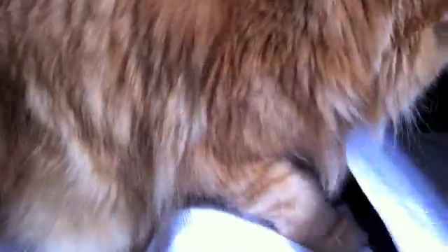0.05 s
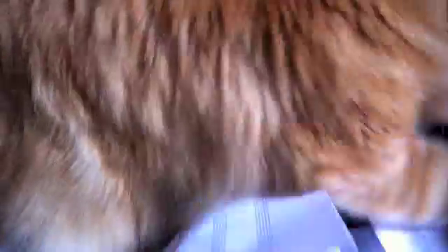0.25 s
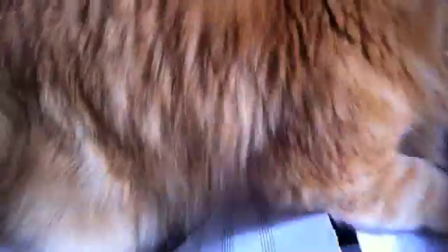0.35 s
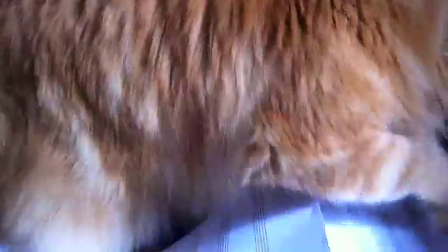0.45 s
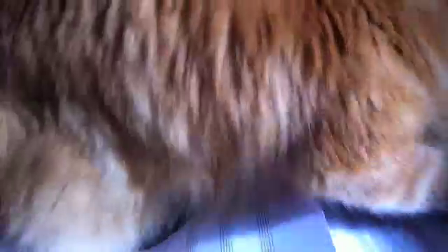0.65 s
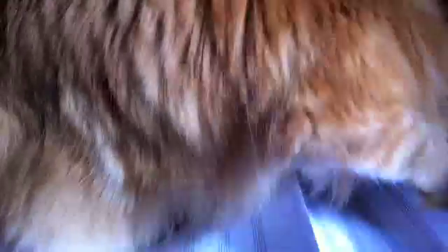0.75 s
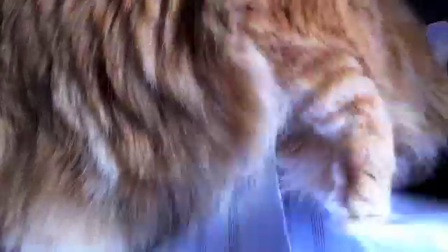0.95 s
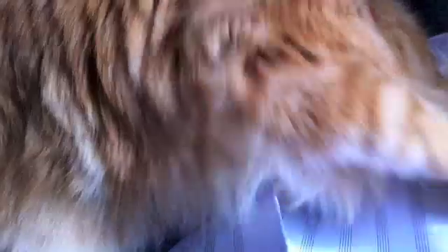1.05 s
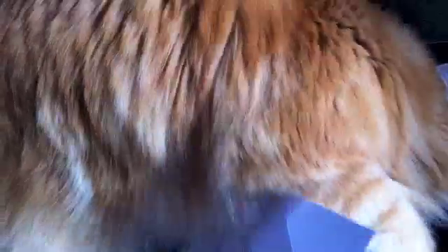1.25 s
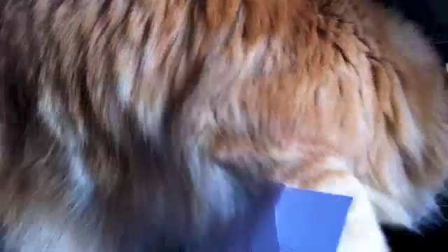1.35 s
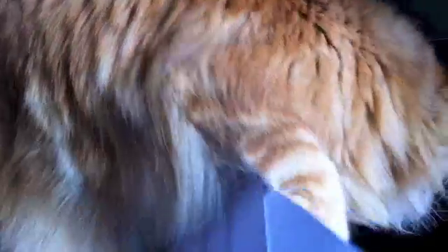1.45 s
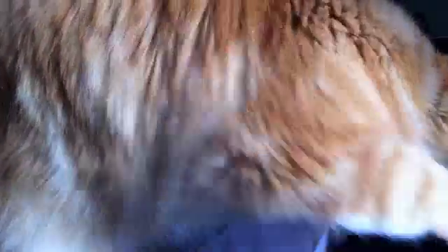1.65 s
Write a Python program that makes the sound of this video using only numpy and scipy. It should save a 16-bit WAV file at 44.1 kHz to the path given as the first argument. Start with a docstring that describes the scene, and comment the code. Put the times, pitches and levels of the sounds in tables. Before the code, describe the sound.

Paper rustles close by under a cat's paws, starting lightly and swelling into sharp crackles around 0.3 to 0.4 seconds. The sheets slide with a hiss, then crinkle again near 0.75 and 0.95 seconds, with soft knocks on hollow plastic beneath. A fuller snap and small thump come at 1.25 seconds. A smoother sliding hiss follows, fading by about 1.7 seconds in a small, quiet room.

```python
"""Paper crackles and snaps close by as a cat treads on loose sheets lying on a printer.
Each push drags paper over paper, and stick-slip friction gives a hiss with a fine crackle.
The sheets buckle with dry snaps and sing faintly where they slide taut. Under them the paws
excite the modes of the hollow plastic casing. A small, quiet room lies behind."""
import sys
import numpy as np
from scipy import signal
from scipy.io import wavfile

SR = 44100
rng = np.random.default_rng(int(sys.argv[2]) if len(sys.argv) > 2 else 0)


def file_out(sig):
    """Save sig as 16-bit WAV at sys.argv[1]."""
    # one column per channel
    cols = np.atleast_2d(sig).T
    # limit, then scale
    lim = np.clip(cols, -1, 1)
    pcm = np.round(lim * 32767).astype(np.int16)
    wavfile.write(sys.argv[1], SR, pcm)


N = 74970
T = np.arange(N) / SR
HZ = np.fft.rfftfreq(8192, 1 / SR)


# Pushes that drag the sheets. Each row: peak time, rise and fall in seconds, crackle share of the
# power from 0 to 1, then levels in dB of the paper's four registers: flap, body, rasp and fizz.
PUSHES = [(.008, 0.037, 0.022, 0.32, -47, -46, -49.5, -50),
          (.075, 0.045, 0.064, 0.8, -52.5, -57, -58.5, -61),
          (.224, 0.026, 0.023, 0.7, -52.5, -48, -47, -45),
          (0.273, 0.026, 0.017, 0.74, -50.5, -41, -41, -47),
          (.288, 0.0065, .011, 0.4, -53.5, -40, -42, -32.5),
          (.303, 0.0078, .012, .25, -47, -40.5, -41, -35),
          (.345, 0.029, 0.022, 0.42, -47, -39.5, -35, -39.5),
          (0.375, .013, 0.018, 0.44, -44.5, -32, -32.5, -37),
          (.462, 0.032, 0.02, 0.18, -59.5, -51.5, -44.5, -45.5),
          (0.528, 0.11, 0.062, .15, -57.5, -49.5, -47.5, -48.5),
          (0.689, 0.039, 0.092, 0.47, -54, -50.5, -47.5, -48),
          (0.776, 0.02, 0.027, 0.64, -46.5, -41, -38, -37.5), (.82, 0.05, 0.082, .1, -54, -53, -52, -52),
          (0.916, .022, 0.01, 0.4, -53, -50.5, -44.5, -43),
          (0.953, 0.046, 0.058, 0.4, -52, -43.5, -41, -45),
          (1.066, 0.023, 0.012, .5, -61, -50, -40.5, -41.5),
          (1.094, 0.028, 0.036, 0.06, -54.5, -49, -45, -43.5),
          (1.189, 0.049, 0.078, 0.25, -53.5, -40.5, -39.5, -38.5),
          (1.279, 0.0053, 0.018, 0.26, -46.5, -35, -39, -47),
          (1.35, 0.059, 0.047, 0.2, -65, -67, -46, -43.5),
          (1.43, 0.083, 0.034, 0, -64.5, -44.5, -44.5, -45.5),
          (1.514, 0.073, 0.068, 0.08, -83, -57.5, -47, -45.5),
          (1.583, 0.08, 0.069, 0.1, -69, -55, -50.5, -50.5),
          (1.695, 0.031, .03, 0.15, -92, -67, -52, -52.5)]
GRAINS_PER_S, GRAIN_SPREAD_DB = 2600, 4.5
JUDDER_DB, JUDDER_HZ = 2.1, 110
PUSH_SHAPE = 1.55  # 1 = pointed, 2 = bell

def rustle(registers):
    """Stick-slip friction: sliding paper hisses, and fibres that catch and slip add a juddering crackle."""
    size = amp(GRAIN_SPREAD_DB * np.minimum(rng.exponential(1, N), 4))
    grains = rng.choice([-1., 1.], N) * size * (rng.random(N) < GRAINS_PER_S / SR)
    judder = low_noise(JUDDER_HZ, N)
    grains = unit(grains * amp(JUDDER_DB * judder))
    hiss = rng.standard_normal(N)
    grain_power, hiss_power = np.zeros((2, len(registers), N))
    for peak, rise, fall, crackle, *levels in PUSHES:
        swell = np.exp(-(abs(T - peak) / np.where(T < peak, rise, fall)) ** PUSH_SHAPE)
        power = (amp(levels)[:, None] * swell) ** 2
        grain_power += crackle * power
        hiss_power += (1 - crackle) * power
    return sum(through(grains * np.sqrt(rough) + hiss * np.sqrt(smooth), response)
               for rough, smooth, response in zip(grain_power, hiss_power, registers))


# Creases giving way. Each row: start and length in seconds, crease resonance in Hz,
# then flap, body, rasp and fizz levels in dB.
SNAPS = [(.0290, .003, 10100, -73, -58, -46.5, -40.5), (0.0581, 0.0049, 5260, -43.5, -39.5, -36, -39),
         (0.1834, 0.0018, 1900, -50.5, -47.5, -49, -51), (0.2075, 0.0014, 6200, -53, -36, -30.5, -39),
         (0.2125, 0.0027, 2140, -67, -39, -37.5, -42), (0.3322, 0.0062, 2040, -54, -28, -23, -27.5),
         (0.3612, 0.0032, 2700, -43.5, -37, -40, -52), (0.3817, 0.00081, 2780, -48, -28, -18.5, -20),
         (0.3849, 0.00063, 11100, -49, -47, -16, -10.5), (0.6513, 0.002, 2050, -66, -36.5, -42.5, -60),
         (0.6551, 0.002, 5800, -62, -44, -32.5, -56), (0.687, .0023, 1760, -47.5, -35, -34.5, -44),
         (0.714, 0.0018, 1990, -59, -43, -54, -48), (0.7612, 0.0028, 2020, -62, -36, -44, -45),
         (0.7659, 0.0063, 1800, -45.5, -36, -38.5, -44), (0.9348, 0.0014, 6500, -56, -30, -18.5, -23.5),
         (0.9379, 0.0049, 1820, -42, -39.5, -30, -35.5), (1.0436, .003, 5170, -74, -43, -34, -41.5),
         (1.0840, 0.0025, 2670, -70, -38, -36.5, -46), (1.149, 0.00096, 2200, -55, -38, -33.5, -34.5),
         (1.1715, .002, 1900, -52, -37, -35.5, -46), (1.1888, 0.0033, 4650, -49, -34, -27, -31),
         (1.2505, 0.002, 1460, -35.5, -22.5, -28, -34), (1.2542, 0.0065, 1560, -41.5, -28, -25.5, -35.5),
         (1.51, 0.0045, 2550, -63, -43, -47.5, -62), (1.6005, 0.0028, 4200, -76, -50.5, -45, -52)]
SNAP_ATTACK_S, SNAP_RELEASE = 0.000063, 0.79  # release as a share of the length
REGISTER_RING_S = (0.003, 0.0019, 0, 0)  # flap and body ring on
FIRST_SLIP_BOOST, FIRST_SLIP_S = 0.5, 0.00048
CREASE_Q, CREASE_GAIN = 8, 1.93

def snaps(registers):
    """Buckling: a crease gives way in an avalanche of clicks, coloured by a resonance of its own."""
    out, t = np.zeros(N), T[:4096]
    attack = np.minimum(t / SNAP_ATTACK_S, 1)
    first_slip = 1 + FIRST_SLIP_BOOST * np.exp(-t / FIRST_SLIP_S)
    for start, length, crease_hz, *levels in SNAPS:
        clicks = rng.choice([-1., 1.], len(t))
        crease = signal.iirpeak(crease_hz, CREASE_Q, fs=SR)
        for db, response, ring_s in zip(levels, registers, REGISTER_RING_S):
            envelope = attack * np.exp(-np.maximum(t - length, 0) / (SNAP_RELEASE * length + ring_s))
            burst = through(clicks * envelope * first_slip, response)
            burst += CREASE_GAIN * signal.lfilter(*crease, burst)
            add(out, start, amp(db) * burst * np.linalg.norm(envelope) / np.linalg.norm(burst))
    return out


# The colour of the paper. Each row: frequency in Hz, relative spectral level in dB.
PAPER_SPECTRUM = [(30, -42), (95, -32), (140, -6.5), (200, -2.5), (300, 1), (400, 1), (520, 0), (700, -1.5),
                  (1150, 5), (1600, 9), (2100, 7.5), (2800, 4), (3300, -1.5), (4000, 2.5), (4900, 7.5),
                  (6200, 4), (7600, -2), (8500, 0), (9800, -1), (12000, -5.5), (14000, -6), (15600, -8.5)]
# Borders in Hz between flap (whole sheet), body (panels), rasp (creases) and fizz (fibres).
CROSSOVERS_HZ = [808, 3320, 6850]

def paper_registers(order=10):
    """Impulse responses: the paper's answer to one click, split into four bands of unit energy."""
    lowpasses = [1 / (1 + (HZ / hz) ** order) for hz in CROSSOVERS_HZ]
    bands = np.diff([np.zeros_like(HZ), *lowpasses, np.ones_like(HZ)], axis=0)
    colour = amp(curve_at(PAPER_SPECTRUM, HZ))
    return [minimum_phase(colour * np.sqrt(abs(band))) for band in bands]


# Sheets sliding taut. Each row: start and length in seconds, first and last pitch in Hz, level in dB.
SLIDES = [(0.444, 0.062, 1408, 1523, -42), (0.483, 0.0763, 1649, 1967, -43), (.5, 0.056, 5330, 5450, -44),
          (1.367, 0.087, 2000, 1945, -43), (1.368, 0.075, 2747, 2690, -48.5),
          (1.551, 0.038, 1653, 970, -50)]
SLIDE_WIDTH = 0.29  # bandwidth of each pole as a share of the first pitch

def slides():
    """Forced resonance: friction noise drives one broad, gliding resonance of the sheet."""
    out = np.zeros(N)
    for start, length, first_hz, last_hz, db in SLIDES:
        progress = np.arange(0, 1, 1 / (length * SR))
        pole = np.exp(-np.pi * SLIDE_WIDTH * first_hz / SR)
        friction = (rng.standard_normal(N) + 1j * rng.standard_normal(N))[:len(progress)]
        baseband = signal.lfilter([1], [1, -2 * pole, pole * pole], friction)
        pitch_hz = first_hz + (last_hz - first_hz) * progress
        carrier = np.exp(2j * np.pi * np.cumsum(pitch_hz) / SR)
        add(out, start, amp(db) * unit((baseband * carrier).real) * np.sin(np.pi * progress))
    return out


# Paws landing on covered plastic. Each row: start in seconds, knock pitch in Hz, knock and thud in dB.
PAW_STEPS = [(.002, 316, -45, -65), (.06, 330, -42.5, -61), (.25, 257, -44, -54), (0.283, 280, -40.5, -50),
             (.336, 397, -38.5, -52), (.364, 471, -37.5, -53), (.68, 200, -42.5, -59),
             (0.729, 217, -43.5, -70), (0.769, 271, -37.5, -59), (.936, 272, -30.5, -74),
             (.975, 352, -42, -74), (1.054, 218, -62, -62), (1.188, 255, -44.5, -54),
             (1.254, 684, -36, -41.5)]
# Modes of the hollow casing. Each row: frequency in Hz, relative level in dB, 60 dB decay in seconds.
CASING_MODES = [(164, -7, 0.18), (297, 6, 0.13), (373.2, 1.5, 0.53), (552, 5, .12)]
PAW_ONSET_S, KNOCK_T60_S, CASING_DB = 0.0022, 0.084, -16
THUD_DECAY_S, THUD_HZ = 0.012, 129

def paws():
    """Impact excitation: each step thuds, knocks and rings the casing; the full weight booms the tray."""
    out, t = np.zeros(N), T[:SR // 2]
    onset = 1 - np.exp(-t / PAW_ONSET_S)
    casing = amp(CASING_DB) * sum(damped_mode(t, *mode) for mode in CASING_MODES)
    for start, knock_hz, knock_db, thud_db in PAW_STEPS:
        knock = damped_mode(t, knock_hz, knock_db, KNOCK_T60_S)
        thud = amp(thud_db) * low_noise(THUD_HZ, len(t)) * np.exp(-t / THUD_DECAY_S)
        add(out, start, onset * (knock + amp(knock_db) * casing + thud))
    tray = damped_mode(t, hz=127, db=-55, t60=0.6)
    add(out, start=1.262, sound=onset * tray)
    return out


# The room's decay. Each row: frequency in Hz, reverberation time in seconds.
ROOM_T60 = [(150, 0.63), (1500, .25), (6000, 0.13), (15000, 0.045)]
TAIL_DB, EARLY_DB = -19, -24
EARLY_DECAY_S, REFLECTIONS_PER_S = 0.0043, 2000

def reverberation(near):
    """Reflection and absorption: quick echoes off nearby surfaces, then a tail whose treble dies first."""
    t = T[:SR // 2]
    diffuse = rng.standard_normal(len(t)) * (t > 0.004)
    hz, times, spectrum = signal.stft(diffuse, SR, nperseg=256)
    decay = amp(-60 * times / curve_at(ROOM_T60, hz)[:, None])
    _, tail = signal.istft(spectrum * decay, SR, nperseg=256)
    early = rng.standard_normal(len(t)) * (rng.random(len(t)) < REFLECTIONS_PER_S / SR)
    early *= (t > 0.001) * np.exp(-t / EARLY_DECAY_S)
    return (amp(TAIL_DB) * through(near, tail / np.linalg.norm(tail))
            + amp(EARLY_DB) * through(near, early / np.linalg.norm(early)))


# The room's background. Each row: frequency in Hz, relative spectral level in dB.
ROOM_TONE_SPECTRUM = [(30, -64), (85, -42), (140, -0.5), (200, 2.5), (350, -3), (700, -3), (1500, 2.5),
                      (3200, -18.5), (5500, -7.5), (10000, -13), (16000, -9.5)]

def room_tone(db=-60.5):
    """Stationary noise: a faint, steady background with a fixed spectrum."""
    colour = minimum_phase(amp(curve_at(ROOM_TONE_SPECTRUM, HZ)))
    return amp(db) * through(rng.standard_normal(N), colour)


def damped_mode(t, hz, db, t60):
    """Free vibration: a sine that falls 60 dB in t60 seconds."""
    return amp(db - 60 * t / t60) * np.sin(2 * np.pi * hz * t)


def low_noise(cutoff_hz, samples):
    """Low-passed noise of rms 1."""
    lowpass = signal.butter(2, cutoff_hz, fs=SR, output="sos")
    return unit(signal.sosfilt(lowpass, rng.standard_normal(samples)))


def minimum_phase(gain):
    """Minimum-phase impulse response: the given spectral shape with a sharp front and unit energy."""
    log_gain = np.log(np.maximum(gain / gain.max(), 1e-4))
    log_spectrum = np.conj(signal.hilbert(np.r_[log_gain, log_gain[-2:0:-1]]))
    response = np.fft.ifft(np.exp(log_spectrum)).real[:2048]
    return response / np.linalg.norm(response)


def amp(db):
    """Decibels to amplitude ratio."""
    return 10 ** (np.asarray(db) / 20)


def unit(x):
    """Normalisation to rms 1."""
    return x / np.sqrt(np.mean(x ** 2) + 1e-20)


def curve_at(points, hz):
    """Interpolation along log frequency."""
    frequencies, values = np.transpose(points)
    return np.interp(np.log(hz + 1), np.log(frequencies), values)


def add(mix, start, sound):
    """Superposition of a sound from a start in seconds."""
    part = mix[max(round(start * SR), 0):][:len(sound)]
    part += sound[:len(part)]


def through(x, response):
    """Convolution, cut to the length of x."""
    return signal.fftconvolve(x, response)[:len(x)]


def scene():
    """Superposition: direct sound of paper and paws, its reflections and the room tone, in mono."""
    registers = paper_registers()
    near = rustle(registers) + snaps(registers) + slides() + paws()
    background = room_tone()
    return (near + reverberation(near) + background)[None]


def record(dry):
    """Band limiting: a linear-phase low-pass removes the highest treble."""
    lowpass = signal.firwin(511, cutoff=15800, window=("kaiser", 8), fs=SR)
    return signal.oaconvolve(dry, lowpass[None], "same")


dry = scene()
out = record(dry)
file_out(out)
```